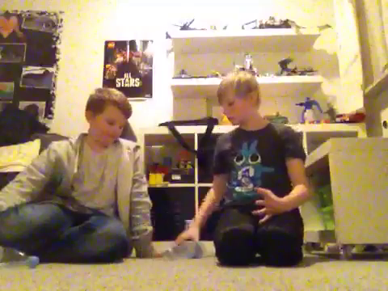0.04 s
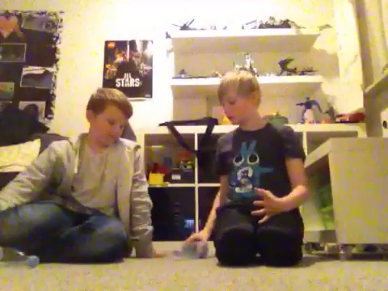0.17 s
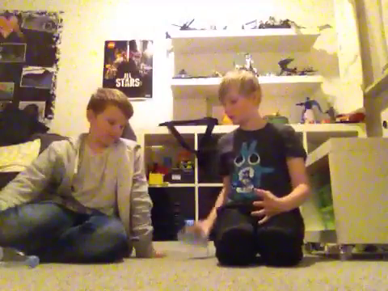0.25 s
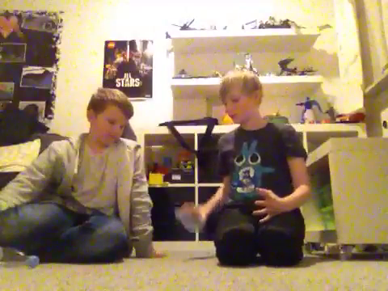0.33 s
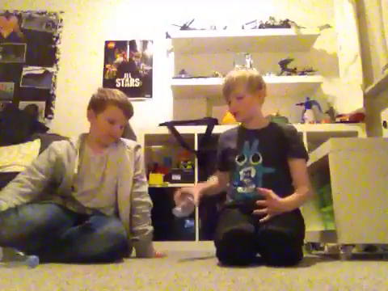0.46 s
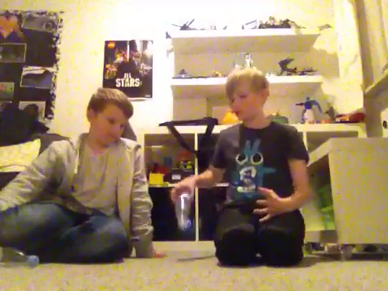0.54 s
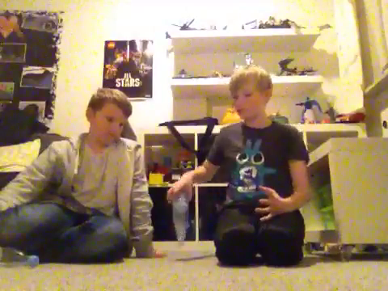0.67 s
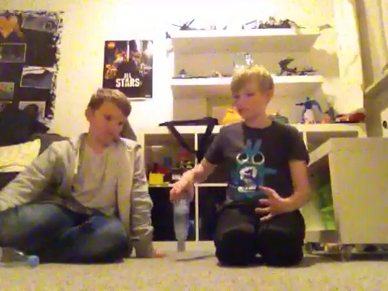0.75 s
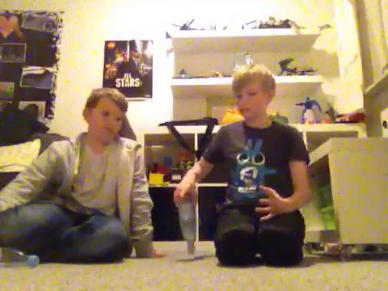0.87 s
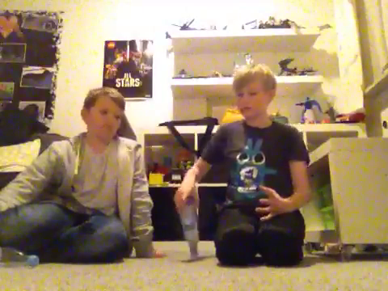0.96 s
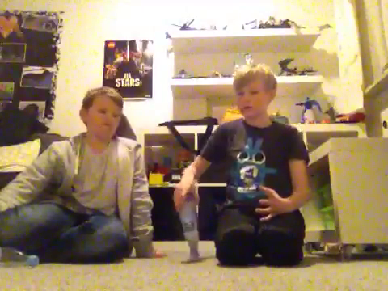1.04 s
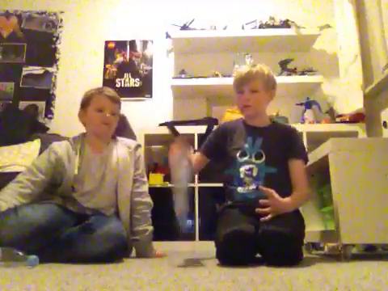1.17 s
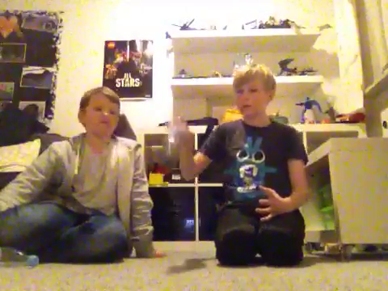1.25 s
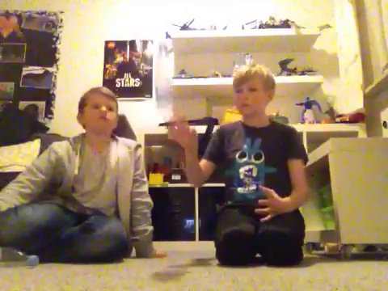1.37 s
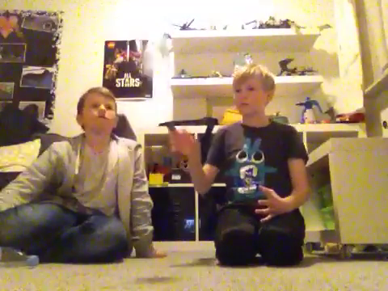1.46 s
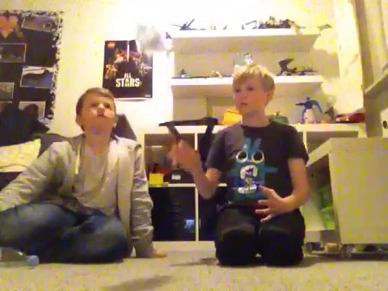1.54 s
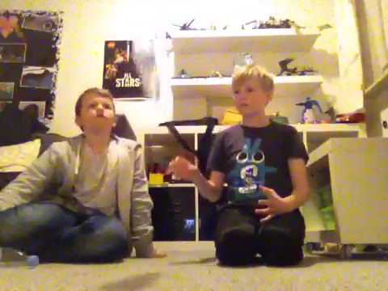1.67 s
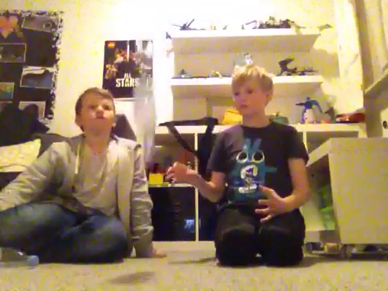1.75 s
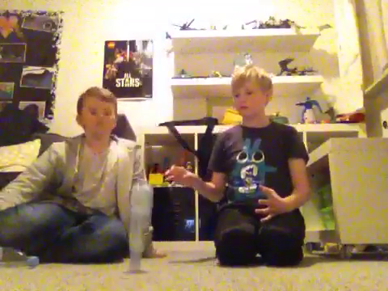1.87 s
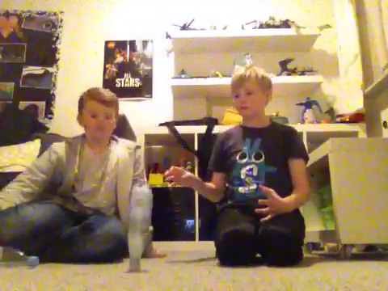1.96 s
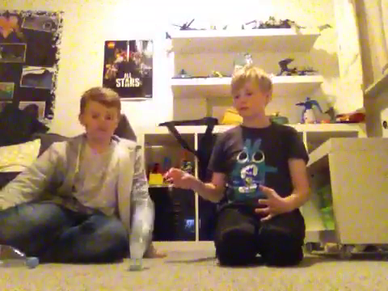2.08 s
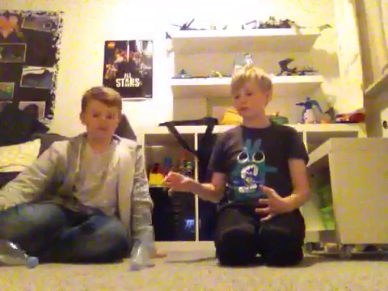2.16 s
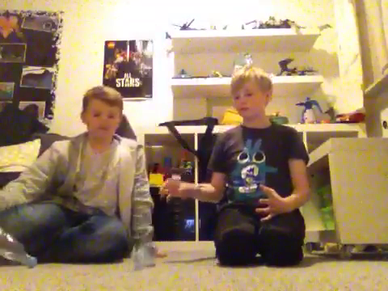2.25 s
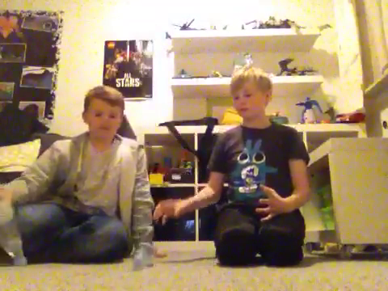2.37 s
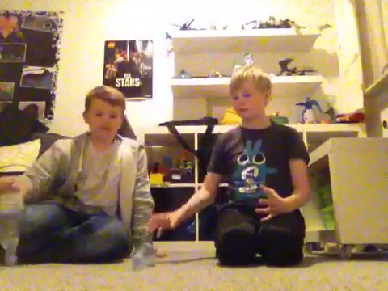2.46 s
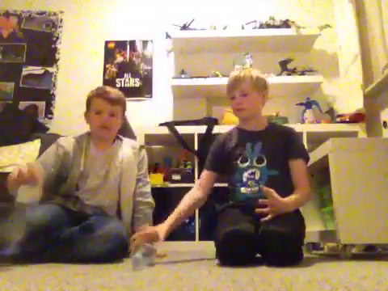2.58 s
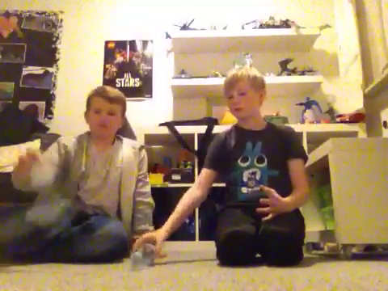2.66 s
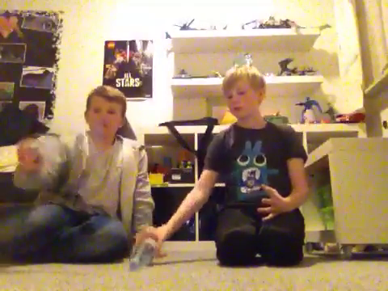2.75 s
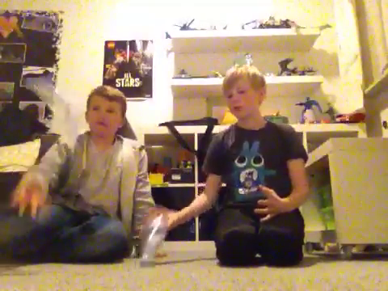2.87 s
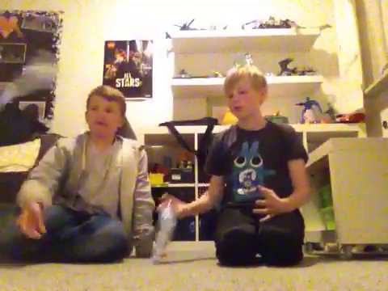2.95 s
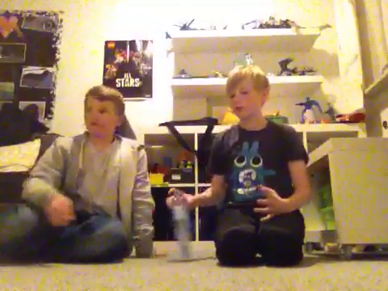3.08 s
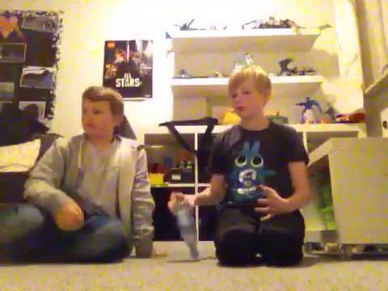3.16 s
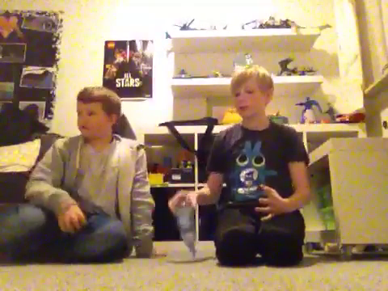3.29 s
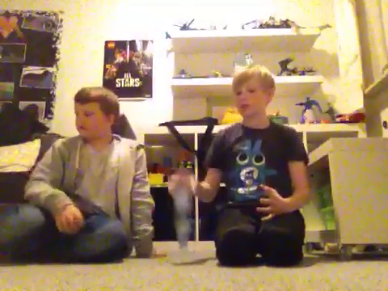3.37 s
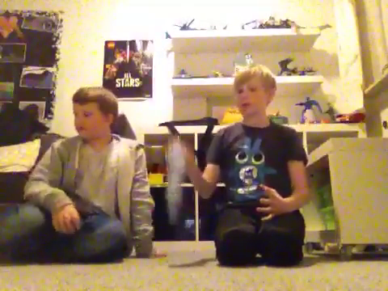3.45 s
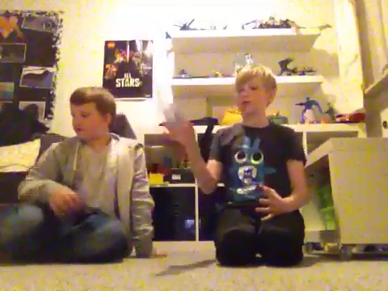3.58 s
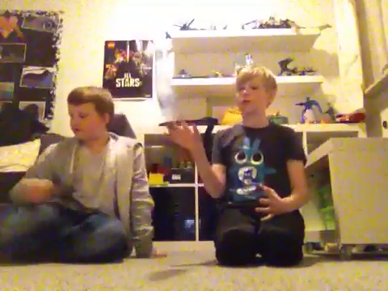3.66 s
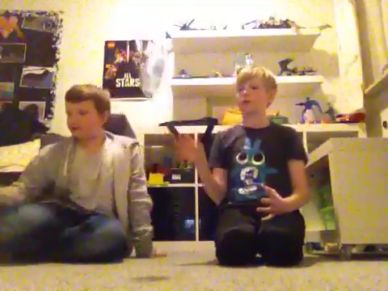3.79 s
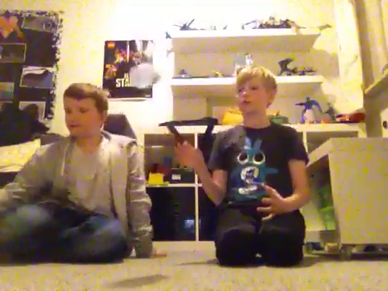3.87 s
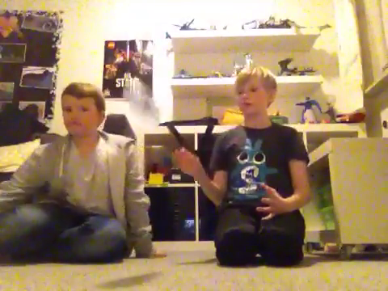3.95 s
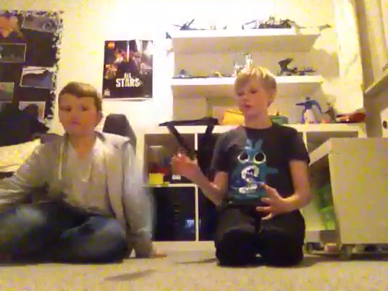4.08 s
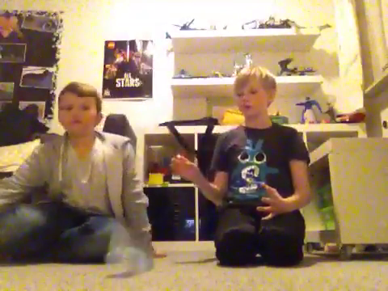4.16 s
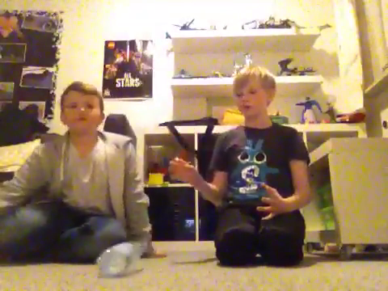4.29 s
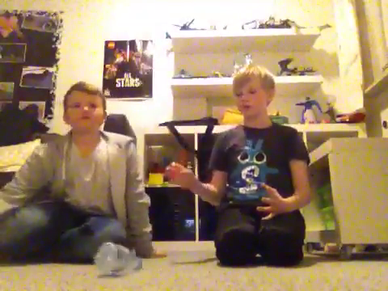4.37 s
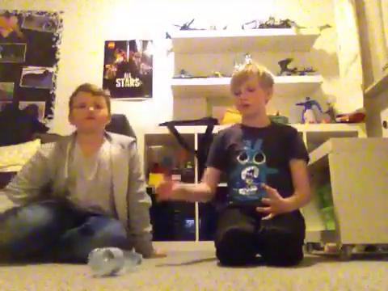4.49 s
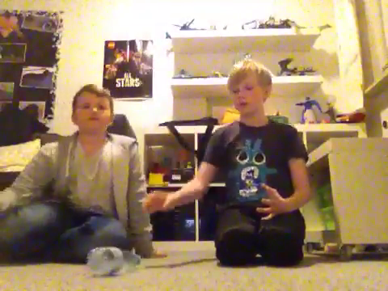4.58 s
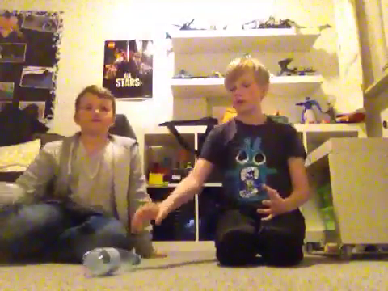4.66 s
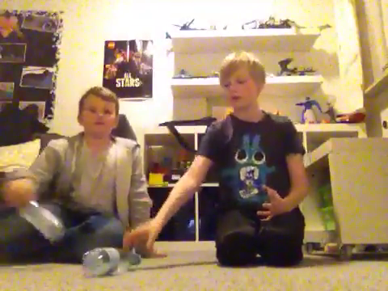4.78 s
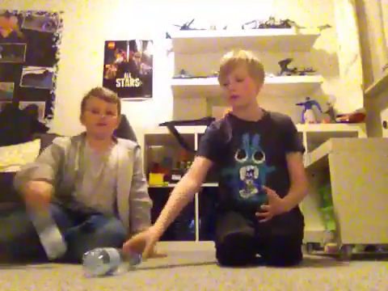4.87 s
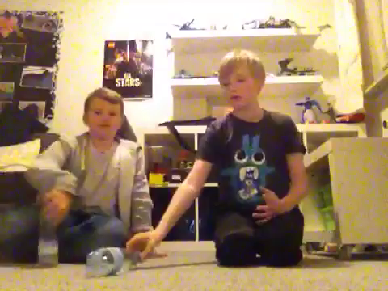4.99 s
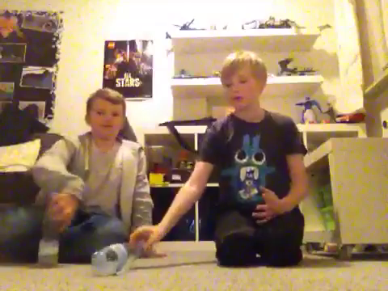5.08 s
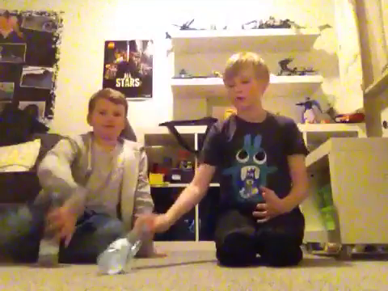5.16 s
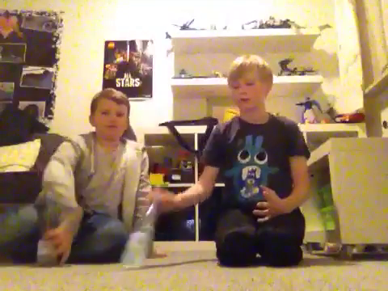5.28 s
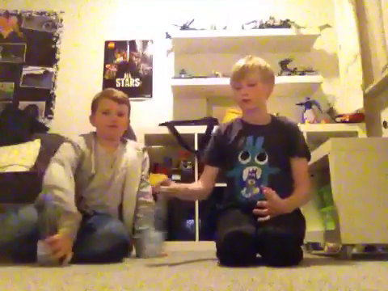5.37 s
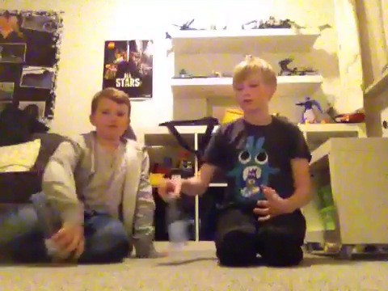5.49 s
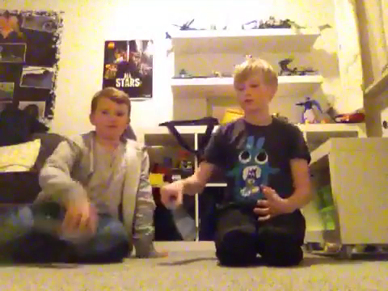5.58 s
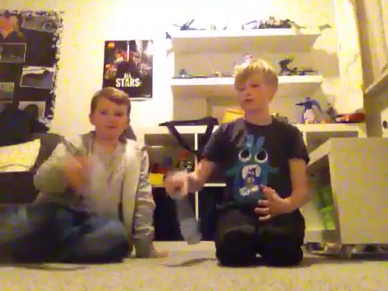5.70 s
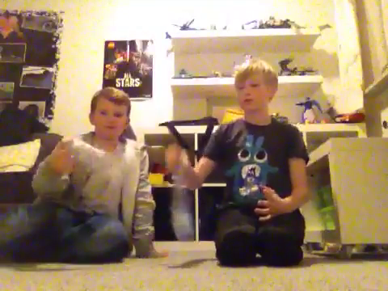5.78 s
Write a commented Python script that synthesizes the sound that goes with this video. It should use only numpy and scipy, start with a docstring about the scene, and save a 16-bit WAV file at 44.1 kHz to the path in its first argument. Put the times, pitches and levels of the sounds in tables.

```python
"""A faint slosh over steady hiss comes first, then a soft bump, then louder landings with water slapping after.
Two partly filled plastic water bottles are flipped and tossed onto the carpet of a small bedroom.
Damped tones make the thumps and wall ticks; clouds of tiny ringing bubbles make the splashes and sloshes.
Single larger bubbles make the gulps. Room echoes surround them over shaped noise, heard through
a small microphone with a limiter."""
import sys
import numpy as np
from scipy import signal
from scipy.fft import rfft, irfft
from scipy.io import wavfile
from scipy.ndimage import uniform_filter1d, minimum_filter1d

SR = 44100
rng = np.random.default_rng(int(sys.argv[2]) if len(sys.argv) > 2 else 0)


def unload_wav(signal):
    """Save mono or channel-first audio to the path in sys.argv[1] as 16-bit WAV at rate SR, clipped to [-1, 1]."""
    wavfile.write(
        sys.argv[1],
        SR,
        np.round(np.clip(np.atleast_2d(signal).T, -1, 1) * 32767).astype(np.int16),
    )


N = 257102  # length of the sound in samples

# Bottles meeting the carpet; levels are before the room and microphone: (time [s], bottle [name],
#     first contact level [dB], treble cutoff [Hz], contacts [count], first gap [s],
#     first wall pitch [Hz], last wall pitch [Hz], wall level against body [dB],
#     splash level before the wall loss [dB], splash tilt [dB per octave])
BOTTLE_LANDINGS = [ (0.228, "flipped", -50.5, 570, 1, 0, 236, 243, -1.5, -47.5, -4.5),
                   (1.9426, "flipped", -17.5, 2700, 5, .0059, 701, 225, -6, -33.5, -2.5),
                   (2.2464, "flipped", -36, 674, 1, 0, 195, 200, -8, -36, -5),
                   (2.796, "flipped", -57, 414, 1, 0, 292, 292, -1.5, -56, 9),
                   (3.051, "flipped", -52, 667, 1, 0, 402, 396, -34, -62, -5),
                   (3.3421, "tossed", -18.5, 1000, 2, .005, 406, 650, 1.5, -41, 1),
                   (3.411, "tossed", -35, 830, 1, 0, 284, 280, -21, -39, -8.5),
                   (3.551, "tossed", -54.5, 2470, 1, 0, 550, 567, -14, -49, -5.5),
                   (4.1885, "flipped", -17.5, 2300, 2, .0088, 987, 290, -5, -33.5, -2),
                   (4.4152, "flipped", -44, 740, 1, 0, 530, 527, -6.5, -55, -3),
                   (5.649, "flipped", -63, 3640, 1, 0, 1370, 1373, 5, -48.5, -5)]
# Tones each bottle rings with on the floor, by bottle name: (pitch [Hz], width [Hz], relative level [dB])
BOTTLE_TONES = { "flipped": [(192.1, 51, 2), (427, 133, 11), (608.7, 53, 4.5), (842, 310, -2.5),
                (1144, 360, -6.5), (1579, 190, -4.5), (2460, 450, -14.5)], "tossed": [(199, 68, -4),
                (315, 150, 3), (607, 105.4, 8), (674.5, 76, -0.5), (1500, 197.3, -26), (1996, 510, -34.5)]}
# Balance of the water spray from low to high: (frequency [Hz], relative level per octave band [dB])
SPRAY_SPECTRUM = [(400, -1.5), (800, -7.5), (1500, 2), (2400, 5.5), (3500, 2), (5500, 6.5), (9000, 4),
                  (15000, 0.5)]
# Single large bubbles, levels before the wall loss: (time [s], pitch [Hz], level [dB], ring [cycles])
LARGE_BUBBLES = [ (0.711, 2670, -57, 120), (0.767, 512, -51, 18), (0.893, 1590, -62.5, 19),
                 (2.824, 1280, -53.5, 52), (2.893, 4440, -50.5, 20), (3.199, 1110, -50, 4.9),
                 (3.475, 2230, -49.5, 6.7), (3.552, 1960, -52.5, 9), (4.514, 1518, -48.5, 7.5),
                 (4.528, 1650, -48, 5.9), (5.098, 734, -54.5, 5.8), (5.268, 504, -53.5, 10.6),
                 (5.358, 458, -47, 8.1), (5.380, 695, -53, 9.8)]
# Standing waves of the room: (pitch [Hz], gain before the wet level [dB], time to fade by 60 dB [s])
STANDING_WAVES = [(111, -1.5, .26), (159.6, 1, 0.1), (168, -6, 0.23), (190.5, 0.5, .32),
                  (227.6, 11.5, 0.14), (294, 11.5, 0.23), (346.1, 1, 0.26), (399, -1.5, 0.19),
                  (410.6, -1.5, 0.12), (407.3, -15, 0.28), (502, 5, .25), (572, 5, 0.088),
                  (650.8, 2.5, 0.059), (673, 2, 0.6), (743, -6.5, .22), (892, -1, .17), (956, -0.5, 0.22),
                  (1116, -7, 0.1), (1490, 0, 0.22), (1644, 1.5, 0.54)]
# Blurred echo of the room:
#     (frequency [Hz], level against direct sound before the wet level [dB], time to fade by 60 dB [s])
DIFFUSE_ECHO = [(100, -2, 0.4), (236, 3, 0.37), (393, -5.5, 0.37), (669, 4, 0.25), (1205, -0.5, 0.22),
                (2450, 3, 0.21), (6027, 1, 0.37), (14000, 3, 0.29)]
# Tone colour of the background: (frequency [Hz], relative level per Hz [dB])
HISS_SPECTRUM = [(18, -62), (30, -39.5), (113, -15), (185, -2), (240, -7), (274, -9), (394, -2.5),
                 (426, -10), (612, -13), (735, -14.5), (2700, -18), (2920, -18.5), (3680, -17.5),
                 (5170, -19), (15000, -24)]
# Loud ticks as thin plastic buckles: (time [s], pitch [Hz], width [Hz], level before the room [dB])
WALL_CREASES = [(2.257, 4600, 3500, -56.5), (2.911, 4660, 1200, -56), (3.020, 2700, 1200, -61.5),
                (3.234, 7960, 3658, -65), (3.344, 10770, 909, -47), (3.346, 1490, 450, -38),
                (4.4662, 2585, 2030, -53), (5.341, 1420, 1100, -59.5), (5.598, 5880, 4000, -70.5)]
# First echoes from furniture and ceiling: (delay [s], gain before the wet level [dB])
FIRST_ECHOES = [(.0098, -20.5), (0.0148, -18.5), (0.023, -12.5), (.041, -19)]
# Water swinging as a bottle is lifted, flipped or rolls, or falling back and churning after a landing; levels
# are before the wall loss: (time [s], length [s], share of length spent swelling [0-1], level [dB], treble tilt
# [dB per octave])
WATER_SWINGS = [ (0.000, 0.039, 0.24, -59, -10.5), (0.702, 0.13, 0.095, -58.5, -0.5),
                (0.765, 0.046, 0.23, -50, -6.5), (1.094, 0.021, 0.32, -58, -1.5),
                (1.525, 0.032, 0.24, -64.5, 3), (1.771, 0.039, 0.21, -67.5, -1),
                (2.098, 0.046, 0.28, -46.5, -6.5), (2.302, 0.15, 0.36, -55.5, -2),
                (2.761, .17, .5, -50, -2.5), (2.897, 0.036, 0.32, -49, -3), (3.019, .11, .1, -54, -3.5),
                (3.191, 0.061, 0.19, -55.5, -5), (3.228, .15, 0.7, -49.5, -2.6),
                (3.439, .11, .2, -50.5, -2.5), (3.564, 0.054, 0.29, -54.5, -3),
                (4.077, 0.12, 0.28, -64.5, -4.5), (4.232, 0.071, .25, -42, -4),
                (4.45, 0.046, 0.43, -49.5, -3.5), (4.52, .11, 0.21, -60.5, -2),
                (4.899, 0.27, 0.45, -57.5, -3.5), (5.235, 0.2, 0.48, -58, -5.5),
                (5.809, 0.043, 0.26, -59.5, 3.5)]

HISS_DB = -62.5  # before the microphone
TOP_HZ = 15400  # highest crinkle pitch and the microphone's treble limit
T = np.arange(SR // 20) / SR  # 50 ms time axis [s] for tones and large bubbles, and for setting their levels

# A landing bottle chatters: each contact is weaker, and each gap is this many times the last
CHATTER_LOSS_DB, CHATTER_GAP_GROWTH = 4.5, 1.34
# Splash length after a 0 dB blow [s], blow step that doubles it [dB], share of it spent swelling
SPLASH_S, SPLASH_DOUBLING_DB, SPLASH_SWELL = .085, 27, .25
# The short slap that opens a splash: length [s], share spent swelling, level against the splash [dB]
SLAP_S, SLAP_SWELL, SLAP_DB = .007, .1, -8
# Faint crinkles in each swing: middle pitch [Hz] and its spread [octaves], width as a share of pitch
CRINKLE_HZ, CRINKLE_SPREAD_OCT, CRINKLE_WIDTH = 3800, .5, 0.54
CRINKLE_DB, CRINKLE_SCATTER_DB = -21, 5.5  # level against the swing, and its random scatter


def amp(db):
    """Turn decibels into a gain."""
    return 10 ** (np.asarray(db) / 20)


def level(x, db):
    """Scale a sound to an average (rms) level in dB."""
    return x * amp(db) / np.sqrt(np.mean(x ** 2) + 1e-30)


def lookup(table, hz, axis=1):
    """Read between the rows of a table, with frequency on a log scale."""
    table = np.array(table, float)
    return np.interp(np.log(np.maximum(hz, 1)), np.log(table[:, 0]), table[:, axis])


def add(out, start_s, x):
    """Mix x into out from a given time."""
    i = max(0, int(start_s * SR))
    out[i:i + len(x)] += x[:max(0, N - i)]


def resonance(hz, width_hz):
    """A damped tone swells and dies away, faster when its width is larger; gain near 1 at its pitch."""
    age = np.pi * width_hz * T
    swell = age * np.exp(-age)
    return 2 * swell / swell.sum() * np.sin(2 * np.pi * hz * T)


def bubble(hz, cycles, t, glide=0.046):
    """A bubble rings for some cycles, rising in pitch as it nears the surface."""
    age = hz * t / cycles
    rise = glide * np.minimum(age, 2) / 2
    onset = 1 - np.exp(-2 * hz * t)
    fade = np.exp(-np.pi * age)
    return fade * onset * np.sin(2 * np.pi * hz * t * (1 + rise))


def moments(length_s, swell, count):
    """Random times within a rush, as a column, crowd towards its peak and thin out after it."""
    return length_s * rng.triangular(0, np.clip(swell, 0, 1), 1, (count, 1))


def landings():
    """Each contact rings the bottle on the floor; a lower cutoff on the carpet passes less treble."""
    out = np.zeros(N)
    for (start_s, bottle, blow_db, cutoff_hz, contacts, gap_s,
         first_hz, last_hz, wall_db, _, _) in BOTTLE_LANDINGS:
        body = sum(amp(tone_db) * resonance(hz, width_hz)
                   for hz, width_hz, tone_db in BOTTLE_TONES[bottle])
        carpet = signal.butter(4, min(cutoff_hz, SR / 4), fs=SR, output="sos")
        wall_pitches = np.geomspace(first_hz, last_hz, round(contacts))
        for k, wall_hz in enumerate(wall_pitches):
            wall = level(resonance(wall_hz, 0.37 * wall_hz), wall_db)
            ring = level(body, 0) + wall
            contact = level(signal.sosfilt(carpet, ring), blow_db - k * CHATTER_LOSS_DB)
            # the minus sign turns the wave over; each contact draws a new diffuse echo
            add(out, start_s, room(-contact))
            start_s += gap_s * CHATTER_GAP_GROWTH ** k
    return out


def rushes():
    """Water swings with the bottle, and each landing drives a slap and a splash, longer after a harder blow."""
    rows = list(WATER_SWINGS)
    for start_s, _, blow_db, *_, splash_db, tilt_db in BOTTLE_LANDINGS:
        splash_s = SPLASH_S * 2 ** (blow_db / SPLASH_DOUBLING_DB)
        rows.append((start_s, SLAP_S, SLAP_SWELL, splash_db + SLAP_DB, tilt_db))
        rows.append((start_s, splash_s, SPLASH_SWELL, splash_db, tilt_db))
    return rows


def sloshes(count=120, cycles=4, scatter_db=4.0):
    """Each rush of water is a cloud of tiny ringing bubbles that builds and thins out."""
    out = np.zeros(N)
    t = T[:len(T) // 8]
    for start_s, length_s, swell, db, tilt_db in rushes():
        first_sample = (moments(length_s, swell, count) * SR).astype(int)
        hz = np.exp(rng.uniform(np.log(400), np.log(15000), (count, 1)))
        tilt = tilt_db * np.log2(hz / hz.mean())
        scatter = scatter_db * rng.standard_normal((count, 1))
        size_db = lookup(SPRAY_SPECTRUM, hz) + tilt + scatter
        # small bubbles die sooner, so they need a higher peak for the same energy
        peak = amp(size_db) * np.sqrt(hz)
        grains = peak * bubble(hz, cycles, t) * (1 - t / t[-1])
        positions = first_sample + np.arange(len(t))
        cloud = np.bincount(positions.ravel(), grains.ravel())  # sum overlapping bubbles
        add(out, start_s, level(cloud, db))
    return out


def gulps():
    """Large pockets of air break through the water one at a time, each ringing as a bubble."""
    out = np.zeros(N)
    for start_s, hz, db, cycles in LARGE_BUBBLES:
        add(out, start_s, level(bubble(hz, cycles, T), db))
    return out


def creases(count=3):
    """The bottle wall makes quickly damped ticks: a few loud ones, and crinkles in each swing."""
    out = np.zeros(N)
    for start_s, hz, width_hz, db in WALL_CREASES:
        add(out, start_s, level(resonance(hz, width_hz), db))
    for start_s, length_s, swell, swing_db, _ in WATER_SWINGS:
        times = moments(length_s, swell, count).ravel()
        for after_s, (pitch, size) in zip(times, rng.standard_normal((count, 2))):
            hz = min(CRINKLE_HZ * 2 ** (CRINKLE_SPREAD_OCT * pitch), TOP_HZ)
            db = swing_db + CRINKLE_DB + CRINKLE_SCATTER_DB * size
            add(out, start_s + after_s, level(resonance(hz, CRINKLE_WIDTH * hz), db))
    return out


def room(x, wet_db=0, build_s=0.0011):
    """Walls return first echoes, a diffuse tail of fading noise bands, and standing waves at fixed pitches."""
    t = np.arange(SR // 3) / SR
    noise = rfft(rng.standard_normal(len(t)))
    bins = np.fft.rfftfreq(len(t), 1 / SR)
    build = 1 - np.exp(-t / build_s)
    response = np.zeros(len(t))
    soft = np.hanning(15)
    for delay_s, db in FIRST_ECHOES:
        add(response, delay_s, amp(db) * soft / soft.sum())  # cluttered surfaces scatter the treble away
    edges = np.geomspace(60, 16000, 17)  # about half an octave apart
    for lo, hi in zip(edges, edges[1:]):
        centre = np.sqrt(lo * hi)
        band = irfft(noise * (bins >= lo) * (bins < hi), len(t))
        t60 = lookup(DIFFUSE_ECHO, centre, axis=2)
        band = band * build * np.exp(-np.log(1000) * t / t60)
        share = np.sqrt(2 * (hi - lo) / SR / len(t))  # wider bands carry more energy
        response += level(band, lookup(DIFFUSE_ECHO, centre)) * share
    for hz, db, t60 in STANDING_WAVES:
        fade = build * np.exp(-np.log(1000) * t / t60)
        response += amp(db) * 2 * fade / fade.sum() * np.cos(2 * np.pi * hz * t)
    direct = signal.unit_impulse(len(t))
    return signal.fftconvolve(x, direct + amp(wet_db) * response)[:N]


def hiss():
    """Shaped steady noise gives the low rush of the room and the hiss of the microphone."""
    shape = amp(lookup(HISS_SPECTRUM, np.fft.rfftfreq(N, 1 / SR)))
    noise = rfft(rng.standard_normal(N))
    return level(irfft(noise * shape, N), HISS_DB)


def scene(count=3, wall_loss_db=3):
    """Mix bottles, water and room; each part of the spray reaches the walls by its own paths."""
    through_wall = amp(-wall_loss_db)  # the water is heard through the plastic
    spray = sum(room(sloshes(), wet_db=-0.5) for _ in range(count)) / np.sqrt(count)
    small = room(creases() + through_wall * gulps(), wet_db=-3.5)
    mix = landings() + through_wall * spray + small + hiss()
    return mix[None]  # one channel


def record(dry, ceiling=1.0, low_cut_hz=122, lopsided=0.056):
    """The microphone drops bass, a quick limiter holds peaks, loud peaks bend a little, and the top is cut."""
    x = signal.sosfilt(signal.butter(3, low_cut_hz, "high", fs=SR, output="sos"), dry)
    gain = np.minimum(1, min(ceiling, 1) / (np.abs(x) + 1e-9))
    held = minimum_filter1d(gain, size=100)  # 100 samples is about 2.3 ms
    x = x * uniform_filter1d(held, size=100)
    x = x + lopsided * x ** 2  # up and down swings become unequal
    return signal.sosfilt(signal.ellip(10, .2, 70, TOP_HZ, fs=SR, output="sos"), x)


dry = scene()
out = record(dry)
unload_wav(out)
```